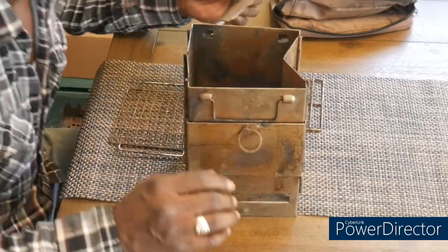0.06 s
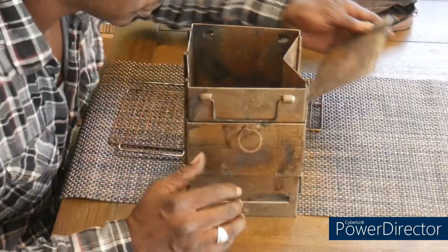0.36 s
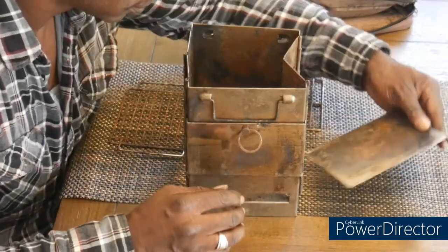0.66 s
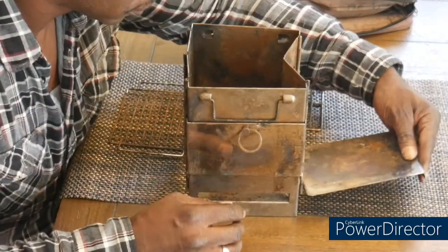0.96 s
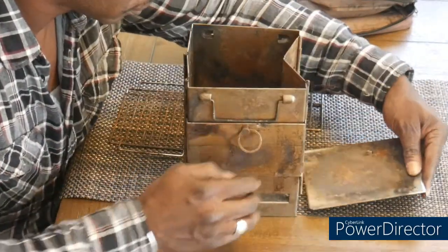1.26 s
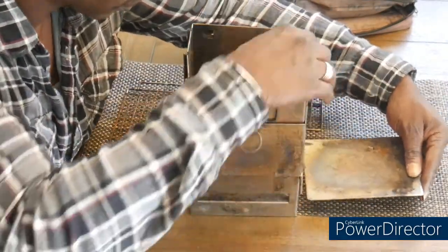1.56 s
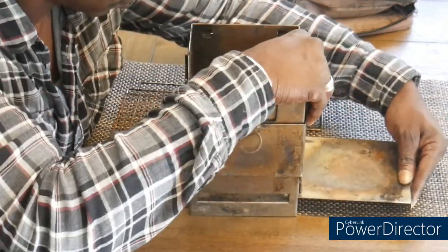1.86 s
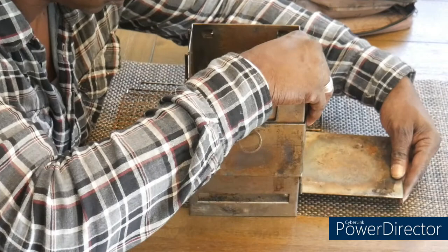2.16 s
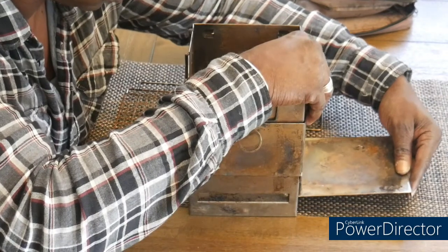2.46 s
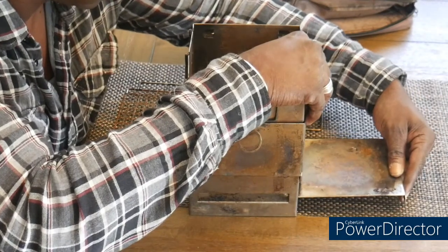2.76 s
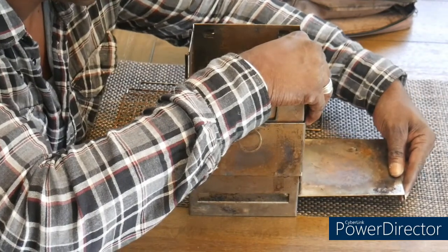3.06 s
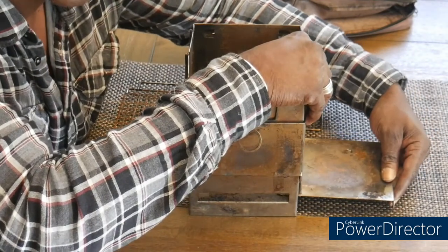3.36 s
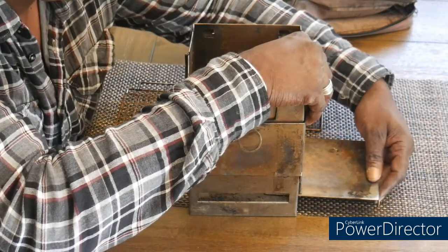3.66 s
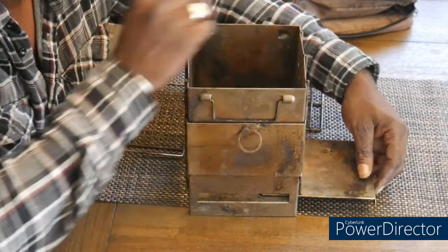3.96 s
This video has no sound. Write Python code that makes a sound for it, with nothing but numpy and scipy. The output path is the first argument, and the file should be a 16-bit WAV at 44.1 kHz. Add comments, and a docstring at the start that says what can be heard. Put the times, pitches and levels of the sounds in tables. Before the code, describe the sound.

A metal plate knocks, scrapes and clanks as it is worked into a steel box.

```python
"""Light ticks and a faint swish sound as a flat steel plate is lifted. It is set down on a mat, booming
through a wooden table, then knocked against a small steel box stove and worked into its slot: scrapes,
brief squeals, one loud clank, a sliding push. Impacts and friction excite the damped modes of the steel,
heard in four registers (thud, clank, ring, tick). A small room reverberates over a soft hiss and rumble."""
import sys
import numpy as np
from scipy import signal
from scipy.fft import rfft, irfft, next_fast_len
from scipy.io import wavfile
from scipy.ndimage import map_coordinates

SR = 44100
rng = np.random.default_rng(int(sys.argv[2]) if len(sys.argv) > 2 else 0)


def dump(signal):
    """Clip the signal to [-1, 1] and save it as 16-bit WAV at the path in sys.argv[1]."""
    limited = np.clip(np.atleast_2d(signal).T, -1, 1)
    pcm = np.round(limited * 32767).astype(np.int16)
    wavfile.write(sys.argv[1], SR, pcm)


N = 176400

# modes of the stove box with the plate in it: f/Hz, relative level/dB, T60/s
BOX_MODES = [(88.5, -4.5, 0.29), (156.7, -2.5, 0.34), (230.8, -1.5, 0.39), (285.2, 1.5, 0.19),
             (346.8, 4, 0.15), (441, -22, 0.15), (452, -18, 0.15), (595, 4.5, .14), (720, 14.5, 0.073),
             (801, 16, 0.067), (894, 4.5, 0.21)]
# spectral envelope of the thin steel's dense overtones: f/Hz, relative level/dB
SHEET_SPECTRUM = [(300, -8.5), (1000, 3.5), (2000, 4.5), (3200, 6.5), (4300, 3), (4900, -10), (5800, -15),
                  (6400, -12), (7500, -10), (10500, -11), (15500, -17.5)]
# boundaries of the thud, clank, ring and tick registers: f/Hz
REGISTER_EDGES = [70, 450, 1500, 4800, 16000]
TOP_HZ = 15900


def knocks(body):
    """Impact excitation: each blow on table or stove sounds the impulse response of steel and room."""
    # t/s, then level/dB of thud, clank, ring, tick
    blows = [(.001, -68, -72, -48.5, -65), (0.0714, -83, -60.5, -39.5, -48.5), (0.0956, -91, -59, -38, -47),
             (.3212, -71, -70, -56.5, -62), (1.0654, -40, -39.5, -36.5, -45.5),
             (1.084, -33, -44.5, -48, -48.5), (1.2393, -62, -79, -46.5, -52),
             (1.291, -34, -45.5, -38.5, -50), (1.729, -43.5, -46.5, -43, -55),
             (1.7593, -43, -44, -44.5, -51), (1.7864, -34, -46, -56, -46.5), (1.796, -29, -37, -42.5, -48),
             (1.816, -29.5, -39.5, -37, -42), (1.829, -33, -52, -40.5, -56), (1.868, -34, -41, -60, -72),
             (1.949, -47, -58, -37, -51), (2.039, -60, -54, -58, -48.5), (2.19, -38.5, -40, -47.5, -53),
             (2.326, -83, -82, -45, -51.5), (2.4266, -35.5, -41, -38, -47.5), (2.4478, -45, -55, -40, -69),
             (2.482, -48, -71, -44, -52), (2.5296, -54, -57, -43.5, -56), (2.589, -41.5, -38.5, -37, -37),
             (2.663, -35.5, -55, -51, -51.5), (2.7769, -68, -78, -60, -68),
             (2.8324, -70, -87, -56.5, -54.5), (2.85, -50.5, -71, -58.5, -60),
             (2.8983, -58, -67, -56.5, -61), (2.9832, -60, -72, -68, -63), (3.019, -55, -88, -62, -65),
             (3.1843, -43, -28, -29.5, -25.5), (3.197, -37.5, -46, -30, -32),
             (3.3138, -34.5, -47, -37.5, -83), (3.329, -41, -72, -63, -76),
             (3.3973, -46.5, -47.5, -49, -66), (3.7734, -45, -46.5, -54, -54.5),
             (3.8371, -43, -62, -48.5, -61.5)]
    out = np.zeros(N)
    for start, *levels_db in blows:
        add(out, start, registers(room(contact(*body)), levels_db, size=SR // 70))
    return out


def steel(count=640):
    """Modal vibration: main modes and thin-wall overtones are damped sinusoids, one row each."""
    # modes of the plate: f/Hz, relative level/dB, T60/s
    plate_modes = [(1163, -1, .3), (1193, -4, .4), (1394, -7, .28), (1555, 0, .3), (1856, -6, .33),
                   (2330, -6, .28), (2482, -6, .25), (2702, -7, .25), (2960, -4, .25), (3273, -5, .3),
                   (3584, -6, .22), (4052, -5, .22), (4368, -7, .2), (4456, -8, .22)]
    t = np.arange(SR // 2) / SR
    main = np.array([amp(db) * np.sin(2 * np.pi * hz * t) * fade(t, t60)
                     for hz, db, t60 in BOX_MODES + plate_modes])
    place = (np.arange(count) + rng.random(count)) / count
    hz = (REGISTER_EDGES[1] + (TOP_HZ - REGISTER_EDGES[1]) * place ** 1.4)[:, None]
    t60 = .12 * (hz / 3000) ** -.2  # higher overtones die sooner
    overtones = amp(along(SHEET_SPECTRUM, hz)) * np.sin(2 * np.pi * hz * t) * fade(t, t60)
    return main, overtones


def contact(main, overtones):
    """Superposition: a touch gives a short crack plus modes, weighted at random for where it lands."""
    # the table top's share of a contact: f/Hz, relative level/dB
    thump_spectrum = [(30, -69), (50, -46), (85, -0.5), (200, 16.5), (350, 13), (500, 2), (1000, -1.5),
                      (15000, -10)]
    t = np.arange(main.shape[1]) / SR
    weights = amp(rng.normal(0, 3.74, len(main))) * rng.choice([-1, 1], len(main))
    crack = noise(len(t), SHEET_SPECTRUM, thump_spectrum) * fade(t, t60=.03)
    shimmer = rng.standard_normal(len(overtones)) @ overtones
    return norm(crack) + amp(-6) * norm(weights @ main) + amp(-3) * norm(shimmer)


def free_rings(body):
    """Free vibration: sprung against the slot, the plate sounds all its own modes together."""
    # t/s, level/dB
    hard_blows = [(3.1845, -31)]
    out = np.zeros(N)
    plate_modes = body[0][len(BOX_MODES):]
    for start, db in hard_blows:
        ring = rng.choice([-1, 1], len(plate_modes)) @ plate_modes
        add(out, start, amp(db) * unit(ring, SR // 70))
    return out


def bumps():
    """Cushioned impact: the mat spreads each push in time, and the table booms under a dull slap."""
    # t/s, rise time/s, boom level/dB, slap level/dB
    pushes = [(.175, 0.0082, -52, -92), (.582, 0.011, -31.5, -33.5), (.611, 0.0057, -36, -41),
              (0.669, 0.0034, -43.5, -67), (0.697, .004, -55, -64), (.735, 0.0041, -65, -85),
              (0.855, 0.011, -67, -89), (1.503, 0.0063, -62, -90), (2.044, .01, -46, -74),
              (2.662, 0.011, -61, -47.5), (3.188, 0.0049, -36.5, -60), (3.32, .005, -55, -59)]
    # spectra of the wooden table's boom and of the slap: f/Hz, relative level/dB
    boom_spectrum = [(25, -41), (45, -53), (62, -14.5), (88, 11), (115, -3.5), (155, 6.5), (200, -2),
                     (300, -6), (500, -26), (1500, -77), (8000, -85)]
    slap_spectrum = [(60, -18), (250, -1), (600, 1.5), (1100, 0), (1700, -7.5), (2600, -18), (4200, -21.5),
                     (5500, -58), (15000, -50)]
    out = np.zeros(N)
    t = np.arange(SR // 2) / SR
    for start, rise, boom_db, slap_db in pushes:
        boom = room(noise(len(t), boom_spectrum) * fade(t, t60=.12))[:len(t)]
        slap = room(noise(len(t), slap_spectrum) * fade(t, t60=.2))[:len(t)]
        onset = np.minimum(t / rise, 1)
        add(out, start, onset * (amp(boom_db) * unit(boom, SR // 40) + amp(slap_db) * slap))
    return out


def scrapes(body, edge_s=.011):
    """Sliding friction: on steel or cloth, a hail of tiny random catches drives the steel's modes."""
    # t/s, duration/s, swell/dB, catch rate/(1/s), then level/dB of thud, clank, ring, tick (a hiss here)
    strokes = [(0.265, 0.21, -6, 4200, -69, -79.5, -68.5, -64.5),
               (1.172, 0.088, -4.5, 2160, -59, -63, -51.5, -59),
               (1.251, 0.038, 9, 4100, -49.5, -53, -43, -42.5),
               (1.769, 0.11, -16.5, 830, -39.5, -53, -45.5, -47.5),
               (1.924, 0.25, -18.5, 620, -50, -54.5, -54, -59.5),
               (2.101, 0.092, 12, 880, -58, -81, -45.5, -53),
               (2.269, 0.05, -3, 900, -52.5, -62.5, -55.5, -58),
               (2.45, 0.103, -2, 960, -52.5, -50, -66, -59.5),
               (2.847, 0.18, 2, 700, -63.5, -77, -68.5, -80),
               (3.09, 0.015, -13, 3100, -55.5, -71, -68.5, -75),
               (3.163, 0.015, 20, 8500, -60.5, -58, -60, -72),
               (3.19, 0.14, -23, 1700, -45, -51, -42.5, -50), (3.29, 0.15, -16, 1140, -55.5, -49, -51, -66),
               (3.56, 0.098, 0.5, 8800, -51, -48.5, -51, -60),
               (3.662, 0.23, -6, 6300, -53.5, -54, -53.5, -65.5),
               (3.894, 0.1, 24, 4400, -71, -89, -64.5, -74)]
    out = np.zeros(N)
    t = np.arange(SR // 2) / SR
    for start, length, swell_db, rate, *levels_db in strokes:
        gate = np.clip(t / edge_s, 0, 1) * np.clip((length - t) / edge_s + 1, 0, 1)
        catches = (rng.random(len(t)) < rate / SR) * rng.standard_normal(len(t))
        catches *= amp(1.5 * rng.standard_normal(len(t)))
        judder_db = 1.2 * wobble(69, len(t))
        force = catches * gate * amp(swell_db * np.minimum(t / length, 1) + judder_db)
        vibration = signal.fftconvolve(force, contact(*body))
        add(out, start, registers(room(vibration), levels_db, size=int(length * SR)))
    return out


def squeals():
    """Stick-slip oscillation: the plate's edge holds one unsteady pitch for a moment."""
    # t/s, duration/s, f/Hz, level/dB
    slips = [(1.76, 0.009, 2020, -30.5), (2.426, 0.0098, 3280, -31.5), (2.427, 0.0059, 2560, -27.5),
             (2.456, 0.011, 3370, -52), (2.479, 0.028, 3236, -43)]
    out = np.zeros(N)
    t = np.arange(SR // 8) / SR
    for start, length, hz, db in slips:
        phase = 2 * np.pi * np.cumsum(hz * (1 + .015 * wobble(400, len(t)))) / SR
        envelope = np.sin(np.pi * np.minimum(t / length, 1) ** .5)
        add(out, start, amp(db) * envelope * np.sin(phase))
    return room(out)[:N]


def swish(width_hz=480):
    """Narrow-band noise: a faint resonance glides down and fades as the plate swings over."""
    # t/s, centre f/Hz, level/dB
    glide = [(.25, 3170, -69), (0.321, 3320, -53), (.38, 3220, -59), (0.432, 3000, -61),
             (0.479, 2570, -64.5), (.53, 2500, -81)]
    times, hz, db = np.transpose(glide)
    t = np.arange(N) / SR
    lowpass = signal.butter(2, width_hz / 2, fs=SR, output="sos")
    in_phase, quadrature = signal.sosfilt(lowpass, rng.standard_normal((2, N)))
    phase = 2 * np.pi * np.cumsum(np.interp(t, times, hz)) / SR
    band = unit(in_phase * np.cos(phase) + quadrature * np.sin(phase))
    return band * amp(np.interp(t, times, db)) * (t > times[0]) * (t < times[-1])


def room(x, build_s=.0026):
    """Reverberation: direct sound plus a diffuse tail that lasts longest in the bass."""
    # f/Hz, T60/s
    decay_times = [(80, 0.54), (300, 0.29), (1500, 0.3), (4000, 0.38), (8000, 0.32), (15000, 0.23)]
    hz, t, spectra = signal.stft(rng.standard_normal(SR // 2), SR, nperseg=256)
    decay = amp(-60 * t / along(decay_times, hz)[:, None])
    tail = signal.istft(spectra * decay, SR, nperseg=256)[1]
    build_up = 1 - np.exp(-np.arange(len(tail)) / SR / build_s)
    response = amp(-4) * norm(tail * build_up)
    response[0] += 1  # direct sound
    return signal.fftconvolve(x, response)


def background():
    """Ambient noise: steady room air, a thin wavering whine and the rumble of arms on the table."""
    # spectra of the air and of the shifting arms: f/Hz, relative level/dB
    air_spectrum = [(25, -9), (60, 4), (140, 4), (250, 7), (450, -20), (1000, -39), (1800, -13),
                    (3000, -13.5), (4300, -5), (5100, -28), (6100, -27), (7200, -10), (10000, -7),
                    (15500, -10)]
    arms_spectrum = [(30, -44), (80, -17), (150, -1), (260, 3), (400, -17.5), (1000, -19.5), (4000, -43.5)]
    whine = amp(-77 + 2.5 * wobble(4.6, N)) * np.sin(2 * np.pi * 4520 * np.arange(N) / SR)
    air = amp(-65.5) * noise(N, air_spectrum)
    arms = amp(-65.5 + 5 * wobble(10, N)) * noise(N, arms_spectrum)
    return air + whine + arms


def registers(x, levels_db, size):
    """Filter bank: thud, clank, ring and tick each get their rms level over the first size samples."""
    out = np.zeros(len(x))
    for low, high, db in zip(REGISTER_EDGES, REGISTER_EDGES[1:], levels_db):
        bandpass = signal.butter(4, [low, high], "band", fs=SR, output="sos")
        out += amp(db) * unit(signal.sosfilt(bandpass, x), size)
    return out


def noise(size, *spectra):
    """Spectral shaping: noise of rms 1, coloured by the given spectra in cascade."""
    padded = next_fast_len(size + 4096)
    hz = np.fft.rfftfreq(padded, 1 / SR)
    gain = amp(sum(along(spectrum, hz) for spectrum in spectra))
    return unit(irfft(rfft(rng.standard_normal(padded)) * gain, padded)[:size])


def wobble(rate, size):
    """Random modulation: a smooth curve with rate knots a second."""
    return map_coordinates(rng.standard_normal(size=1024), [np.arange(size) * rate / SR], mode="wrap")


def fade(t, t60):
    """Exponential damping: 60 dB down after t60 seconds."""
    return np.exp(-np.log(1000) * t / t60)


def along(points, hz):
    """Interpolation of (f/Hz, value) points on a log frequency axis."""
    knots_hz, values = np.transpose(points)
    return np.interp(np.log(hz + 1), np.log(knots_hz + 1), values)


def amp(db):
    """Amplitude ratio of a level in decibels."""
    return 10 ** (np.asarray(db) / 20)


def unit(x, size=None):
    """Normalisation to rms 1 over the first size samples (all by default)."""
    return x / np.sqrt(np.mean(x[:size] ** 2) + 1e-20)


def norm(x):
    """Normalisation to unit energy."""
    return x / (np.linalg.norm(x) + 1e-20)


def add(out, start, x):
    """Superposition of x on out from start seconds."""
    part = out[max(round(start * SR), 0):][:len(x)]
    part += x[:len(part)]


def scene():
    """Linear superposition: all sources sum in one channel; knocks, rings and scrapes share the steel."""
    body = steel()
    mix = knocks(body) + free_rings(body) + bumps() + scrapes(body) + squeals() + swish() + background()
    return mix[None]


def record(dry, low_cut_hz=55):
    """Band limiting: the deepest bass is thinned and nothing above TOP_HZ passes."""
    thinned = signal.sosfilt(signal.butter(3, low_cut_hz, "high", fs=SR, output="sos"), dry)
    padded = next_fast_len(N + SR // 2)
    passband = np.fft.rfftfreq(padded, 1 / SR) < TOP_HZ
    return irfft(rfft(thinned, padded) * passband, padded)[..., :N]


dry = scene()
out = record(dry)
dump(out)
```